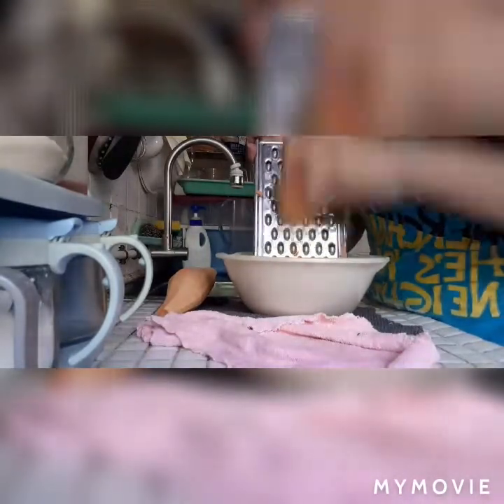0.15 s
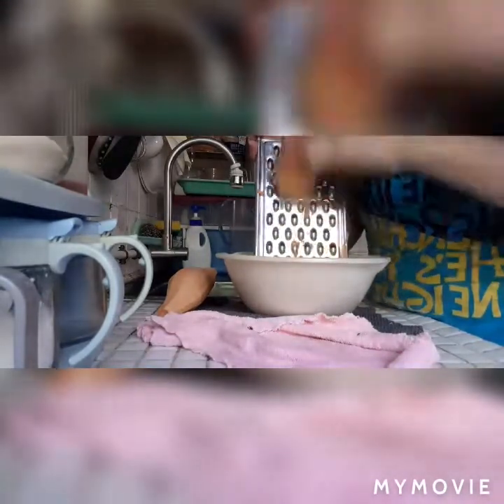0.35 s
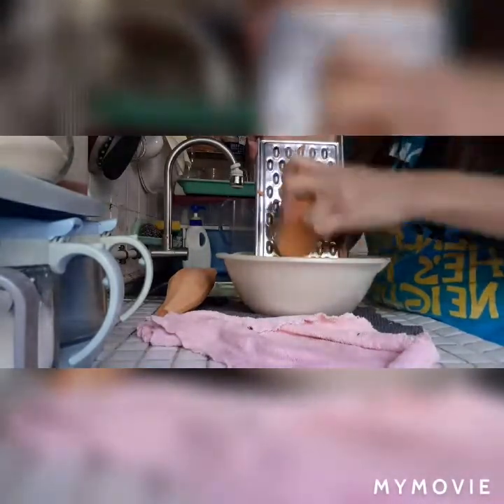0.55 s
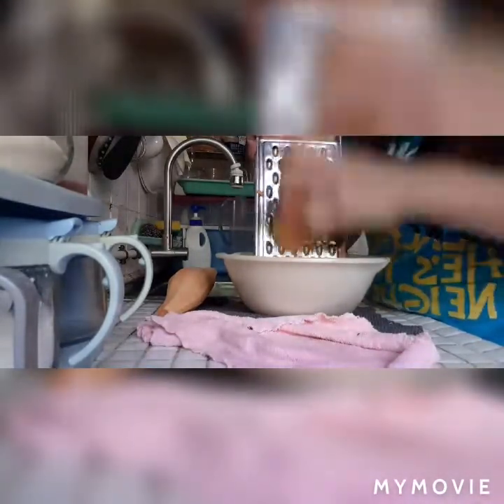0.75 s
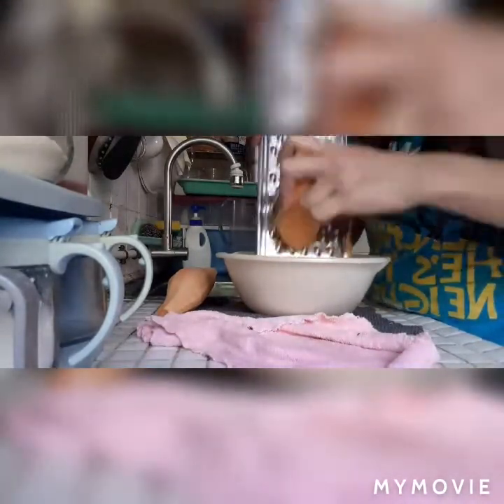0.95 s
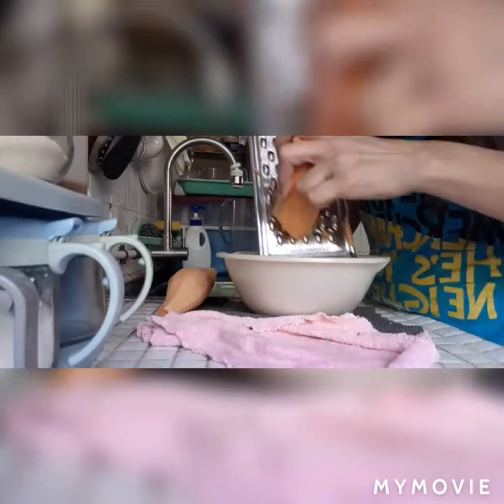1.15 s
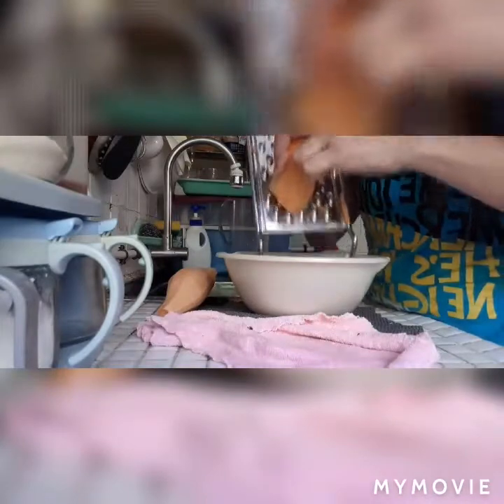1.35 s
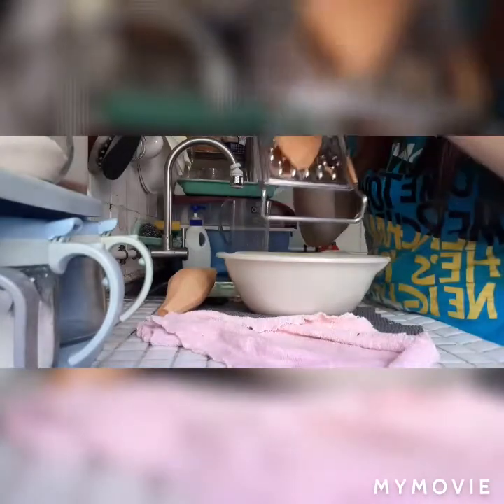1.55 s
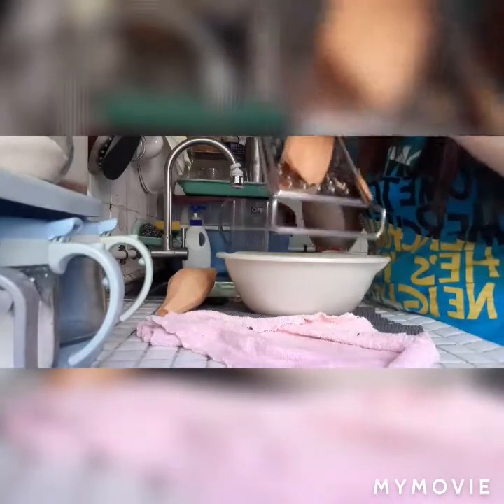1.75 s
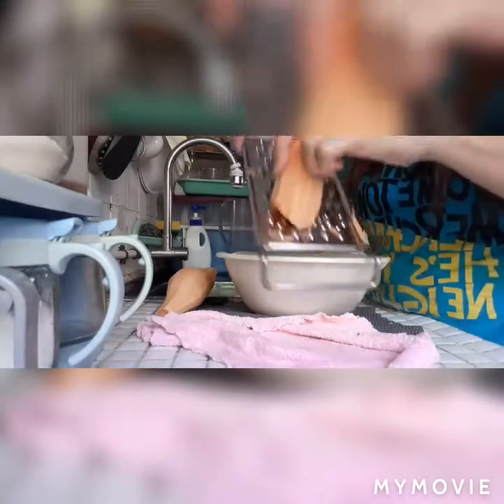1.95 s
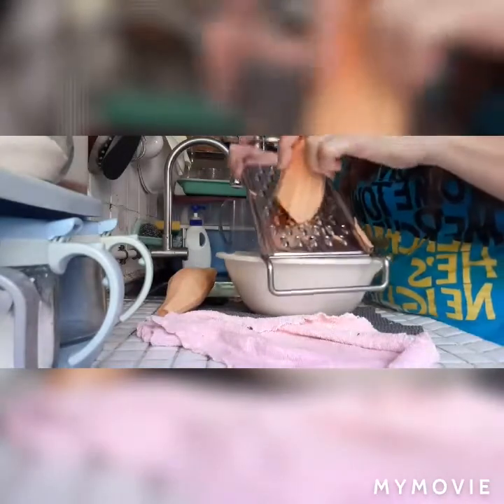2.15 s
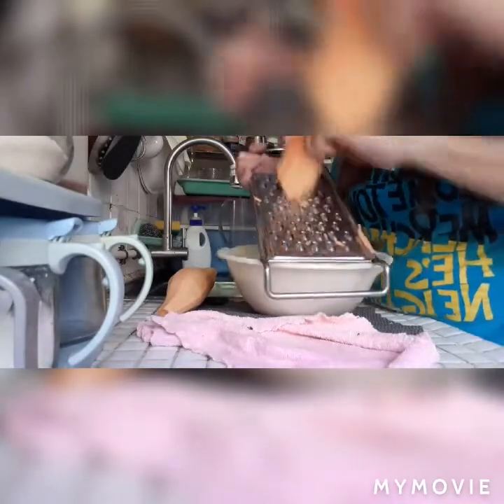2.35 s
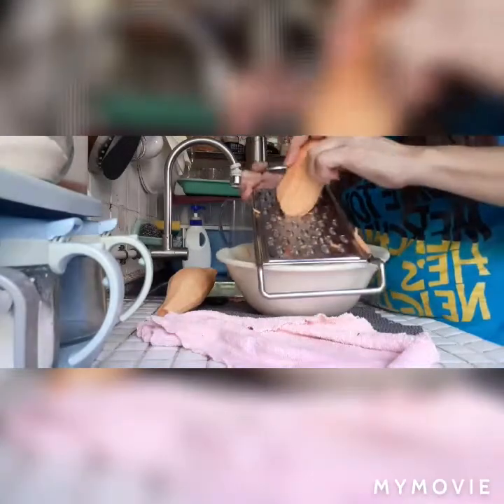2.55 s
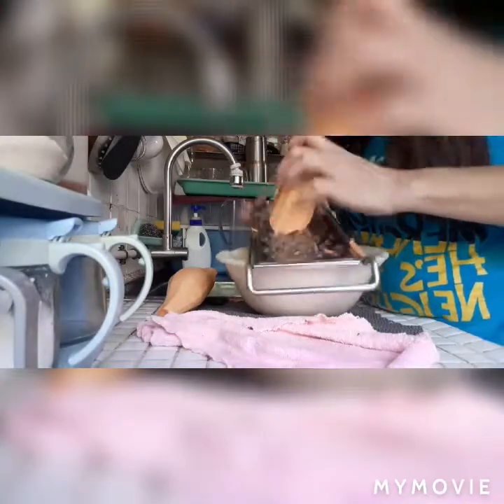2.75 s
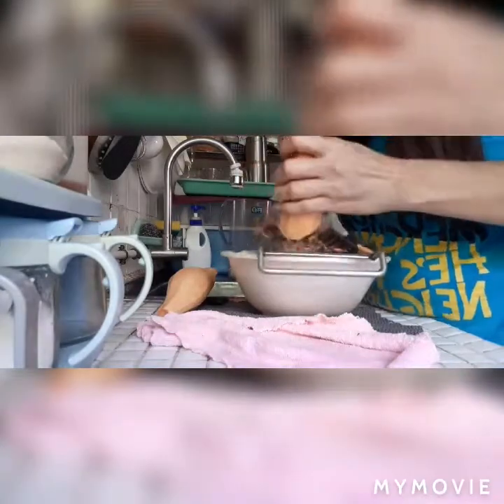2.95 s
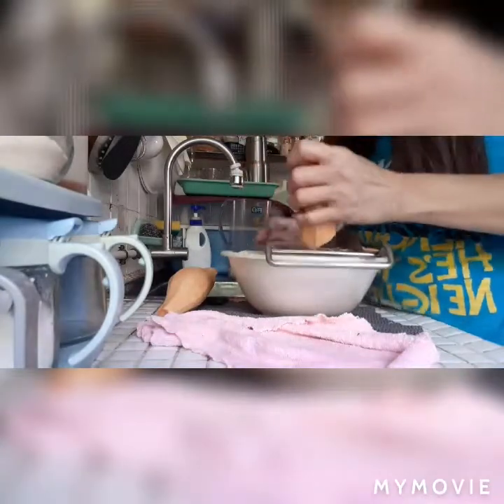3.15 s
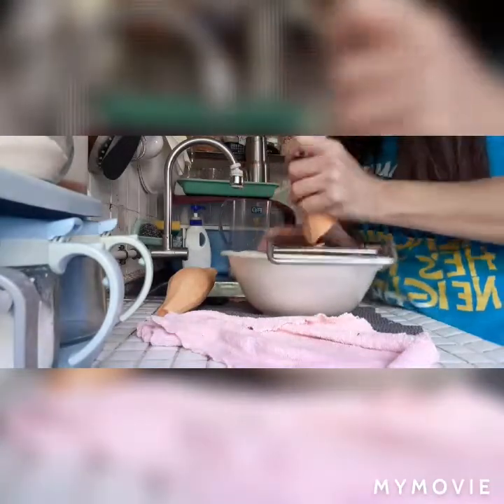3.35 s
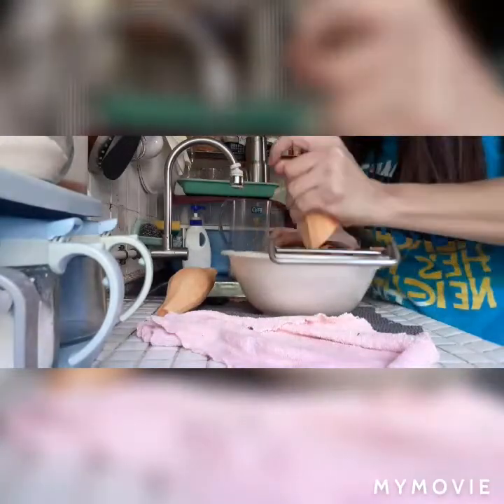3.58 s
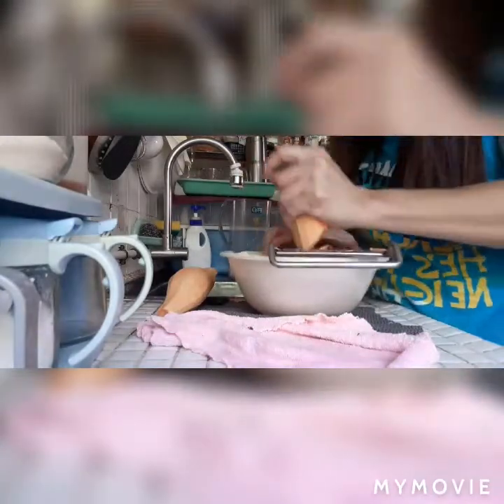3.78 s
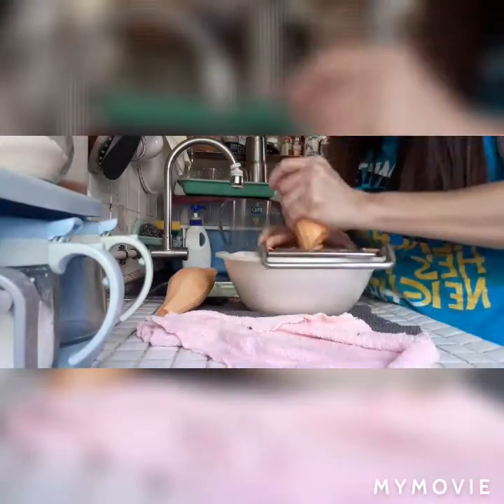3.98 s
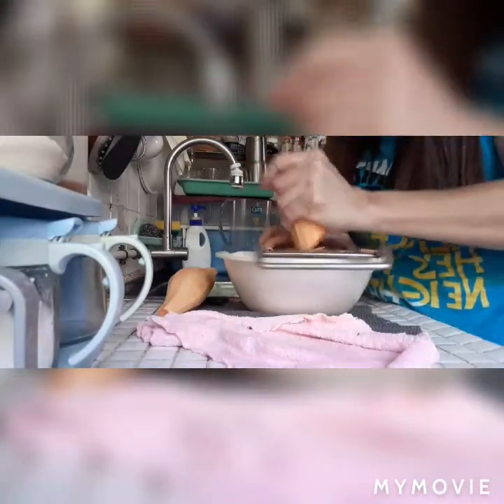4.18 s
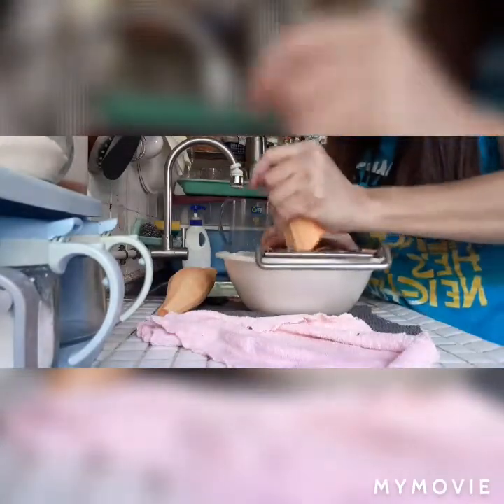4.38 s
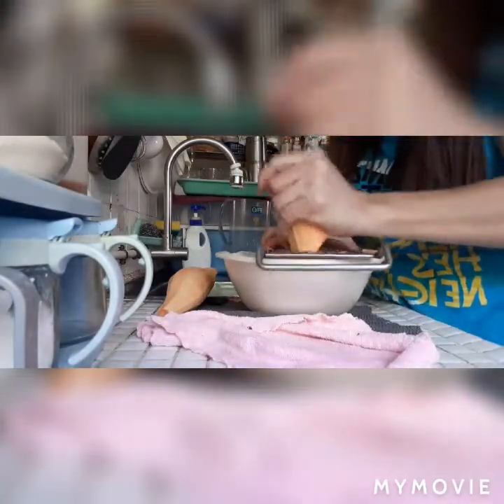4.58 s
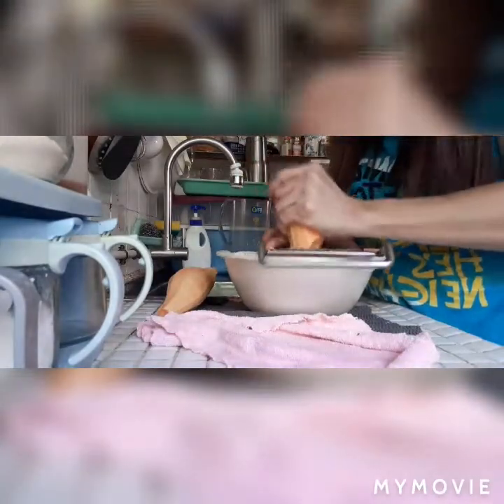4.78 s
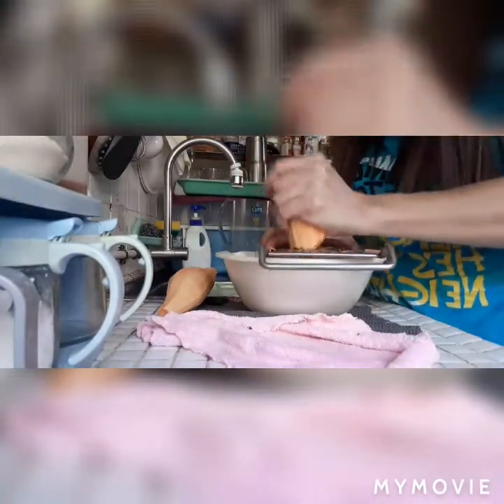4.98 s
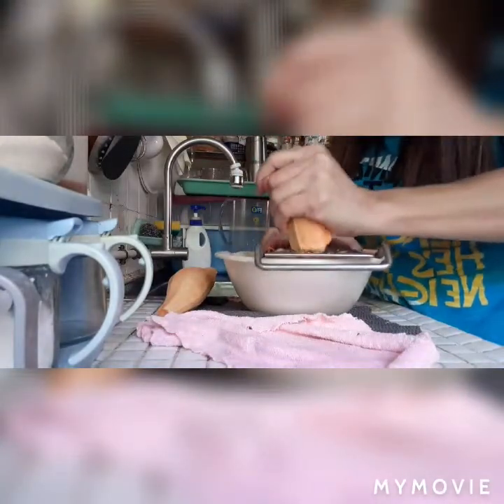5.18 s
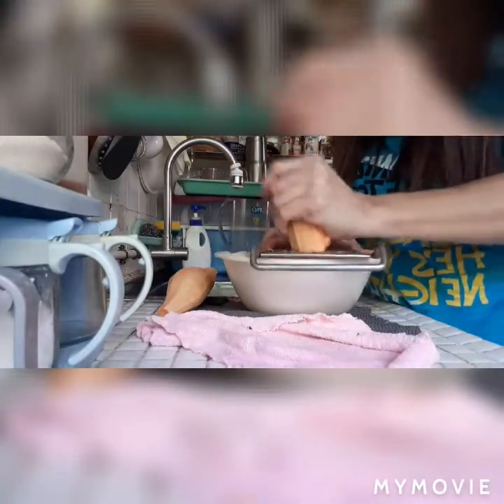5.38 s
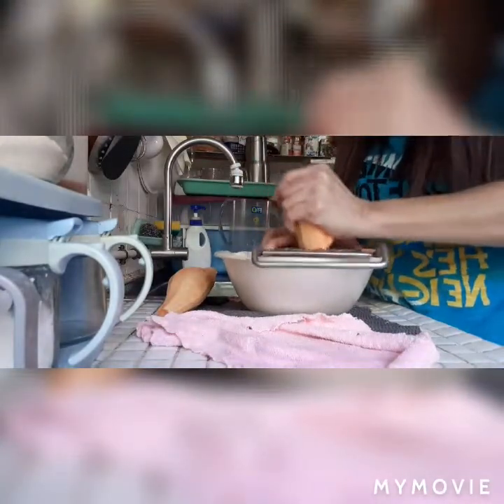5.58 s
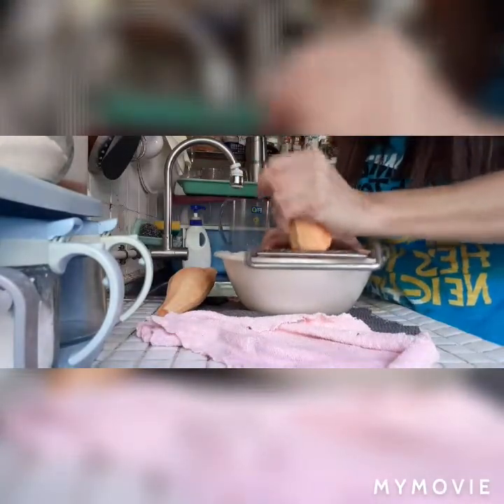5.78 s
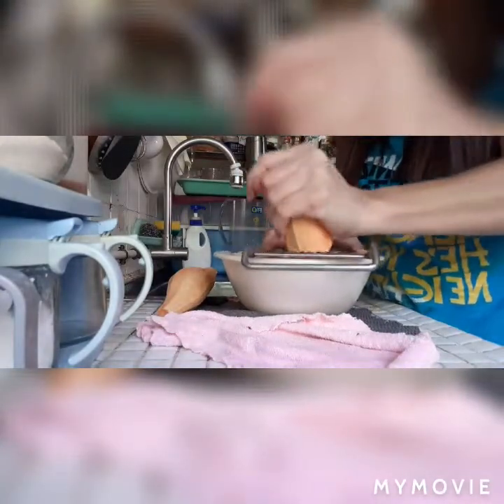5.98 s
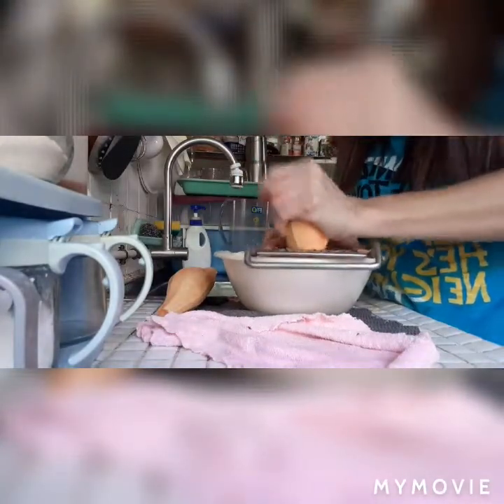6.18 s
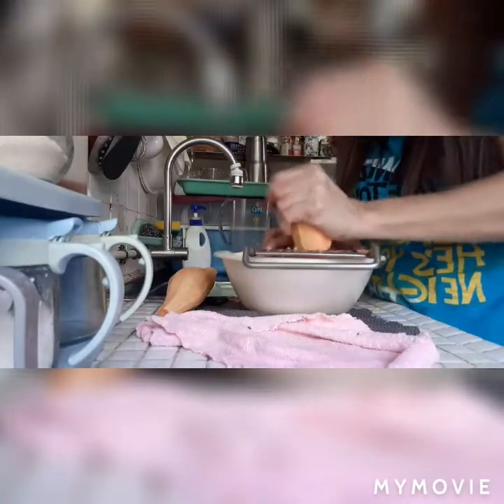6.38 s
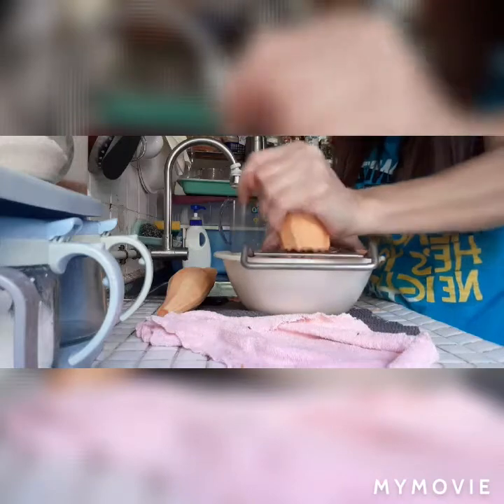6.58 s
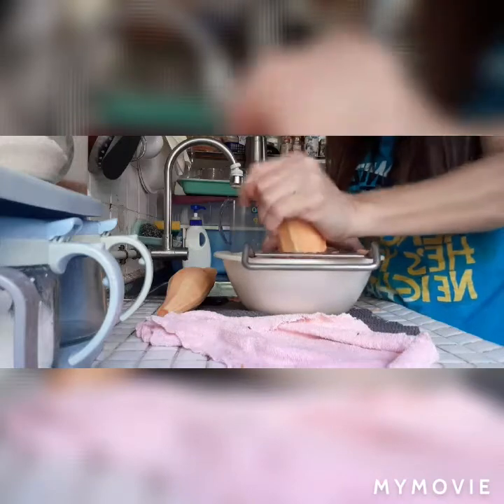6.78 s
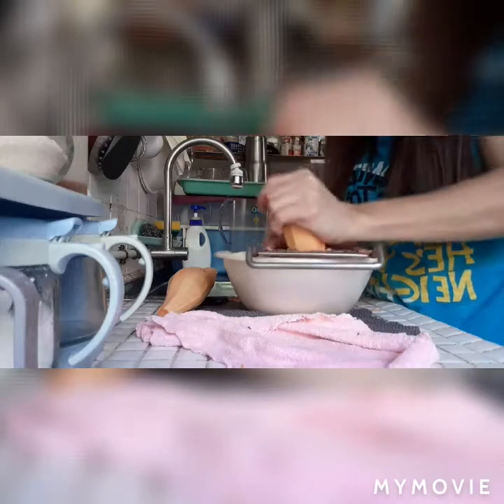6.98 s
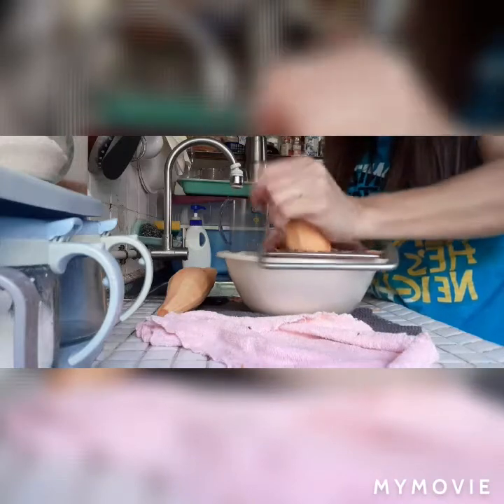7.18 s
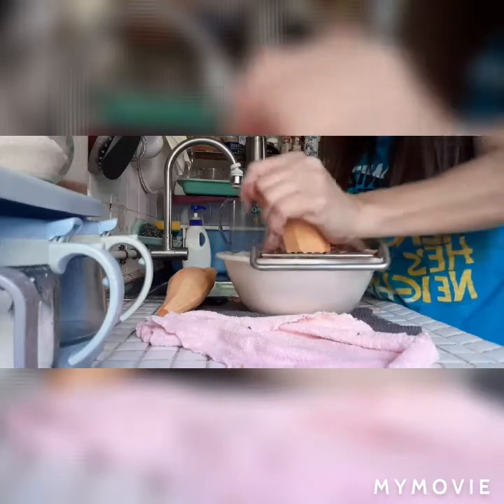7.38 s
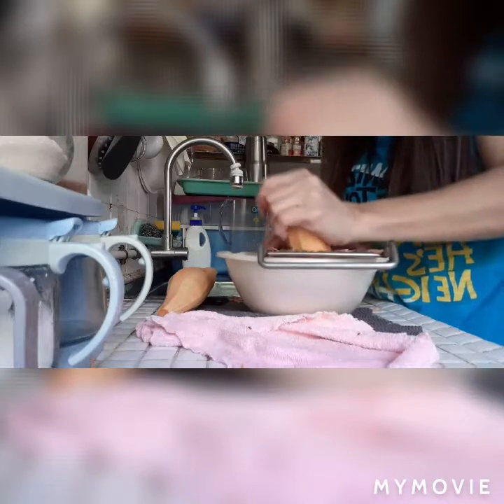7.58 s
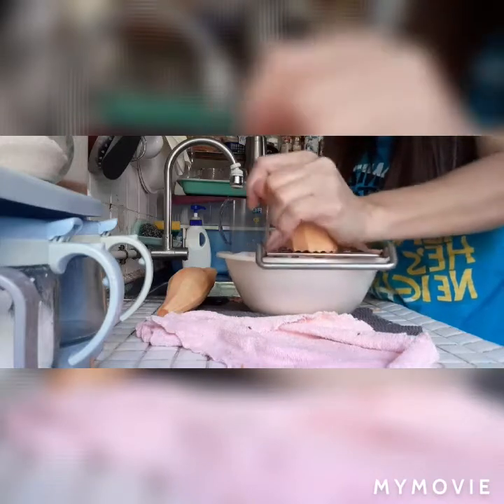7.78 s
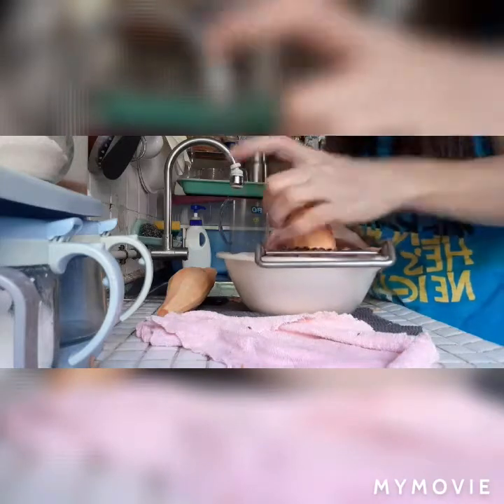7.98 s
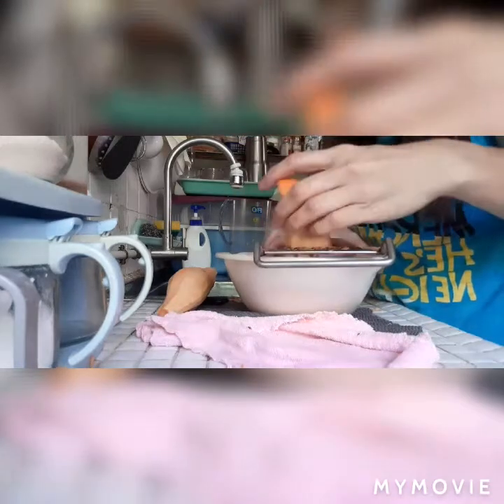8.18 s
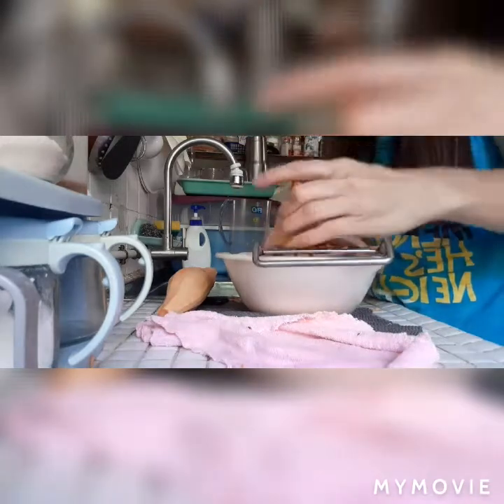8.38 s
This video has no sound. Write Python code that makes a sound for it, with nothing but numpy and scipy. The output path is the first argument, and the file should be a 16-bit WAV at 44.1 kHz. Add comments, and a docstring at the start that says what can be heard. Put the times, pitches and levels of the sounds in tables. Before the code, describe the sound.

A raw sweet potato is grated on a steel box grater in a few quick, crisp strokes. The grater is then shifted with light knocks, loose scrapes and faint wet squeaks, and lands across a bowl with a briefly ringing clank. A longer, even run of rasping strokes follows, nearly four a second. Soft thuds come through the counter, all heard close by in a quiet kitchen.

```python
"""A raw sweet potato is grated on a steel box grater over a bowl on a kitchen counter. First come a few
strokes with the grater upright: each push snaps fibres on the teeth (fizz, rasp) and shakes the box,
each return only rubs, and the counter thuds softly. Then the grater is lifted and knocks about, the wet
flesh squeaks, and at about 3 s the grater lands across the bowl, ringing its wire handle.
Last comes a long, even run of strokes."""
import sys
import numpy as np
from scipy import signal
from scipy.fft import rfft, irfft
from scipy.io import wavfile
from scipy.ndimage import uniform_filter1d

SR = 44100
rng = np.random.default_rng(int(sys.argv[2]) if len(sys.argv) > 2 else 0)


def unload_wav(signal):
    """Save mono or channel-first audio to the path in sys.argv[1] as 16-bit WAV at rate SR, clipped to [-1, 1]."""
    wavfile.write(
        sys.argv[1],
        SR,
        np.round(np.clip(np.atleast_2d(signal).T, -1, 1) * 32767).astype(np.int16),
    )


N = 371763
TIME = np.arange(N) / SR

# Levels in the tables are relative: each sound gets its final loudness when it is mixed.
# pushes of the potato down the teeth: (start [s], length [s], fizz [dB])
PUSHES = [(-0.07, 0.11, -35), (0.133, 0.15, -30), (0.424, 0.14, -30.5), (0.699, 0.14, -30),
          (3.51, 0.13, -39), (3.771, .14, -36.5), (4.031, .13, -34.5), (4.289, 0.13, -32),
          (4.547, 0.13, -31), (4.811, 0.15, -32), (5.082, .13, -30.5), (5.346, 0.15, -31),
          (5.635, 0.14, -30), (5.909, 0.14, -30), (6.182, .128, -31.5), (6.442, 0.16, -29),
          (6.736, 0.14, -28.5), (7.009, 0.13, -30.5), (7.297, 0.15, -30), (7.59, .152, -28)]
# the two ways to hold the grater: (push box ring over fizz [dB], return fizz [dB],
# return rasp over fizz [dB], return box ring over fizz [dB], longest return [s])
UPRIGHT = (-5, -49.5, -4.5, 5, .18)
ACROSS_BOWL = (-5, -40.3, -7.3, 1.6, .128)
# loose scrapes as potato and grater are moved:
# (start [s], end [s], fastest point [0-1], fizz [dB], rasp over fizz [dB], box ring over fizz [dB])
SCRAPES = [(1.47, 1.8, .2, -73, -13.5, 5), (2.367, 2.465, .42, -47, -2.5, 4),
           (2.43, 2.505, 0.38, -42.5, -3.5, 5.5), (2.575, 2.685, 0.23, -62.4, -2, 10.5),
           (2.665, 2.865, 0.25, -51, -5, 11.5), (2.955, 3.02, .5, -68, 0, 18),
           (8.19, 8.3, .3, -70.5, 0, 11)]
# tone colours of snapping fibres, tearing shreds, the shaken box, the counter, the quiet room
# and the rocking bowl: (frequency [Hz], level [dB])
FIZZ_COLOUR = [(5000, -53.5), (7500, -19), (8300, -3), (9100, -.5), (10400, -2.5), (11500, -9), (13000, -9),
               (15800, -13.5)]
RASP_COLOUR = [(300, -21), (1000, -1), (1800, 3), (2500, -1.7), (3100, -1.7), (4400, 1.5), (5100, -1.2),
               (5900, .2), (7300, -1.5), (9000, -16), (14000, -33)]
BOX_COLOUR = [(120, -35), (280, -19), (390, -14.5), (490, -15.5), (630, -17.5), (760, -2.5), (850, 1),
              (1020, -17), (1160, -12.5), (1400, -27), (1640, -14.5), (2000, -31.5), (2450, -25),
              (4000, -41.5)]
RUMBLE_COLOUR = [(20, -42.5), (45, -5.5), (70, -0.5), (120, -3), (200, -9), (300, -16.5), (600, -33.5),
                 (2000, -60.5)]
ROOM_COLOUR = [(20, -46), (45, -4.5), (75, -0.5), (150, -6), (250, -6), (420, -15.5), (850, -18),
               (1700, -23.5), (2600, -30), (3500, -40.5), (7500, -55.5), (8800, -42), (11000, -53),
               (15800, -58)]
BOWL_COLOUR = [(120, -27), (280, -3), (430, -1), (680, -2.5), (1100, -13.5), (3000, -40)]
# echo from the kitchen tiles: (frequency [Hz], time to fade by 60 dB [s])
TILE_ECHO = [(100, 0.58), (800, 0.18), (3000, 0.32), (9000, 0.19), (16000, 0.27)]
# the notes the steel box rings with: (pitch [Hz], level [dB], base time to fade by 60 dB [s])
BOX_NOTES = [(308.5, -3, 0.039), (400, 0.5, 0.052), (582, -11, .05), (781, -3, 0.019), (853, -1, 0.024),
             (927, -25, 0.032), (1190, -12.5, 0.02), (1545, -5, 0.032), (1690, -3, 0.023),
             (1960, -7.5, .022), (2153, -7, .025), (2432, -3.5, 0.016), (2787, -6.5, 0.02),
             (3140, -13.5, .02), (3570, -17, .02), (4030, -15, 0.022), (4700, -23, .022)]
# knocks, light ticks and tooth catches of the grater: (time [s], clank [dB],
# hollow bottom over clank [dB], bright edge over clank [dB], sizzle over clank [dB], ring time [factor])
KNOCKS = [(0.037, -57, 4, 9, 1, 1.2), (0.147, -43.5, -6, -6.5, -2, 1.2), (0.315, -49.5, -21, 2.5, -6, 1.8),
          (0.872, -61, 5, 14, -11, 1.2), (2.015, -36, -4, -9, -27, 1.3),
          (2.034, -34.5, -3, -11.5, -25, .92), (2.234, -51.5, -13, -16, -28, 1),
          (2.399, -35, -28, -14, -6, 1.4), (2.47, -29.5, -6, -12, -16, 1.17),
          (2.8, -31, -3.5, -8, -17, 1.1), (2.922, -50, -5.5, -9.5, -26, 2.2), (2.985, -52, -5, -3, -20, 2),
          (3.078, -20.2, -9, -9, -23, 2.6), (3.113, -33, -0.5, -13, -19, 1.3),
          (3.174, -42, 0, -4.5, -20, 0.55), (3.405, -37.5, -3, -14.5, -32, 2),
          (3.439, -33, -4.5, -8, -16, 1.45), (3.497, -46.5, -1, -9, -24, 1.1),
          (3.674, -45.5, .5, -5, -14, 1), (3.709, -36.5, -6.5, -15, -16, 1.3),
          (3.75, -29, -8.5, -6.5, -26, 0.87), (3.939, -30, -12, -9.5, -17, 1),
          (3.957, -37, 0, -3.5, -20, 1.3), (4.006, -30.5, -4, -7, -25, 1.1),
          (4.425, -39.5, -22, 3, -23, 1.1), (5.04, -30, -19, -11, -20, 1.5),
          (5.556, -30, -2.5, -5, -16, .69), (5.823, -34, -4, -5, -13, 1.2), (6.309, -39, -13, -5, 2.5, 1.7),
          (6.764, -44, -21, -7, 6, 1), (7.458, -57, 0, 12.5, -6, 1)]
# a tooth catching, like a tiny knock: the columns of KNOCKS without the time
TOOTH_CATCH = (-51, -9, -4.5, -7, 1.1)
# the arms lean on the counter and it rumbles: (start [s], length [s], level [dB])
ARM_LEANS = [(0.618, 0.25, -38.5), (.95, 0.38, -40), (2.02, 0.15, -36), (3.82, 0.093, -33),
             (4.19, .22, -40.5), (4.893, 0.21, -31), (6.529, 0.29, -35.5), (8.03, 0.34, -36.5)]
# soft bumps through the counter: (time [s], level [dB], pitch [Hz])
THUDS = [(0.803, -27, 83.4), (0.992, -27, 143), (1.059, -28.5, 78.1), (1.264, -30.5, 67.3),
         (4.94, -31, 178), (5.013, -29, 113), (5.944, -25, 75.4), (6.581, -29, 118), (6.639, -27, 113),
         (6.679, -28, 106), (7.479, -28, 72.7), (7.988, -26.5, 91.5), (8.126, -23, 94.2)]
# wet flesh squeaking on steel: (start [s], length [s], pitch [Hz], level [dB])
SQUEAKS = [(2.502, 0.19, 5060, -63), (2.563, 0.15, 6487, -72), (2.696, .03, 850, -26),
           (2.725, .05, 900, -35), (5.574, .034, 790, -25.5), (5.962, .022, 850, -22),
           (6.7, .022, 848, -28), (7.203, 0.055, 4080, -55), (7.55, .022, 840, -21)]
# the notes of the wire handle: (pitch [Hz], level [dB], time to fade by 60 dB [s])
HANDLE_NOTES = [(256, -25, 0.12), (1550, -31.5, 0.14), (1700, -20, 0.085), (1955, -34, .11),
                (3640, -33, 0.06)]

LANDING_S = 3.079  # the grater is laid across the bowl


def gain_of(db):
    """Turns decibels into a number to multiply a sound by."""
    return 10 ** (np.asarray(db) / 20)


def evened(x):
    """Scales a signal to an average strength (rms) of 1."""
    return x / np.sqrt(np.mean(x ** 2) + 1e-20)


def look_up(points, hz):
    """Reads between the rows of a (frequency, value) table, on a scale of octaves."""
    known_hz, value = np.transpose(points)
    return np.interp(np.log(hz + 1), np.log(known_hz + 1), value)


def add(mix, start_s, sound):
    """Mixes a sound in at the given time."""
    part = mix[max(round(start_s * SR), 0):][:len(sound)]
    part += sound[:len(part)]


def coloured(x, colour, ripple_db=0, size=4096):
    """Gives a sound a tone colour; the ripple stands for the many narrow notes of thin sheet steel."""
    hz = np.fft.rfftfreq(size, 1 / SR)
    ripple = evened(uniform_filter1d(uniform_filter1d(rng.standard_normal(len(hz)), size=6), size=4))
    level_db = look_up(colour, hz) + ripple_db * ripple * np.minimum(hz / 2000, 1)
    # fold the filter in time so that it rings only after a click, never before
    cepstrum = irfft(np.log(gain_of(level_db)))
    cepstrum[1:size // 2] *= 2
    cepstrum[size // 2 + 1:] = 0
    ring = irfft(np.exp(rfft(cepstrum)))
    return signal.oaconvolve(x, ring / np.linalg.norm(ring))[:len(x)]


def wander(hz):
    """A smooth random wobble, with up to about hz swings a second."""
    frequency = np.fft.rfftfreq(N, 1 / SR)
    return evened(irfft(rfft(rng.standard_normal(N)) / (1 + (frequency / hz) ** 4), N))


def hand_strokes():
    """Lists the pushes, and the light returns between them, as rows like those of SCRAPES."""
    push_fastest, return_fastest = .52, .71  # share of the way through the stroke
    overlap_s, let_go_s = .006, .35  # strokes overlap at the turn; a long gap has no return
    push_rasp_db, full_push_db, bear_down_db_per_s = -9, -29, .65
    pushes, returns, last_end = [], [], -np.inf
    for start, length, db in PUSHES:
        hold = UPRIGHT if start < LANDING_S else ACROSS_BOWL
        box_db, back_db, back_rasp_db, back_box_db, back_s = hold
        if start - last_end < let_go_s:
            back_db += .55 * (db - full_push_db)  # a louder return leads into a louder push
            back_start = max(last_end - overlap_s, start - back_s)
            returns.append((back_start, start + overlap_s, return_fastest, back_db, back_rasp_db, back_box_db))
        last_end = start + length
        box_db += bear_down_db_per_s * max(start - LANDING_S, 0)  # the box shakes more and more
        pushes.append((start, last_end, push_fastest, db, push_rasp_db, box_db))
    return pushes, returns


def stroke_loudness(strokes, swell):
    """Loudness curves for fizz, rasp and box ring: the hand speeds up and slows down in each stroke."""
    power = np.zeros((3, N))
    for start, end, fastest, db, rasp_db, box_db in strokes:
        during = (TIME > start) & (TIME < end)
        fastest_s = start + fastest * (end - start)
        speed = np.sin(np.interp(TIME[during], [start, fastest_s, end], [0, np.pi / 2, np.pi]))
        power[:, during] += (gain_of([[db], [db + rasp_db], [db + box_db]]) * speed ** swell) ** 2
    return np.sqrt(power)


def snaps(per_s, spread_db):
    """Random clicks, a few much larger than the rest."""
    size = gain_of(spread_db * np.minimum(rng.exponential(1, N), 4))
    return evened(size * rng.choice([-1, 1], N) * (rng.random(N) < per_s / SR))


def steel_plate(x, colour, place, ripple_db, detune):
    """The potato damps the plate where it presses, so the colour glides between five contact points."""
    out, step = np.zeros(N), .5
    for point in np.arange(-1, 1 + step, step):
        nearness = np.cos(np.pi / 2 * np.minimum(abs(place - point) / step, 1))
        shifted = [(hz * (1 + detune * point), db) for hz, db in colour]
        out += coloured(x * nearness, shifted, ripple_db)
    # neighbouring points partly boost each other, so turn down the places between them
    return out / np.sqrt(1 + .5 * abs(np.sin(np.pi * place / step)))


def grating(pushes, rubs):
    """Fibres snap on the teeth (fizz), shreds tear (rasp) and slips of the whole potato shake the box."""
    bite = wander(hz=79)  # rows of teeth bite and let go
    cut_fizz, cut_rasp, cut_box = stroke_loudness(pushes, swell=1.34) * evened(gain_of(1.45 * bite))
    rub_fizz, rub_rasp, rub_box = stroke_loudness(rubs, swell=1.22) * evened(gain_of(2.2 * bite))
    upright_shift = .4 * (TIME < LANDING_S)  # upright, it is rubbed nearer one end and rings higher
    place = np.sin(1.22 * wander(hz=8) + upright_shift)  # contact point on the plate, -1 to 1
    fibres = snaps(per_s=9500, spread_db=2.5)
    tears = snaps(per_s=3500, spread_db=2.5)
    dull_fibres = signal.sosfilt(signal.butter(1, 11600, fs=SR, output="sos"), fibres)
    crackle = cut_fizz * fibres + gain_of(2.5) * rub_fizz * dull_fibres  # rubbing is duller than cutting
    fizz = steel_plate(crackle, FIZZ_COLOUR, place, ripple_db=2, detune=.02)
    rasp = steel_plate((cut_rasp + rub_rasp) * tears, RASP_COLOUR, place, ripple_db=3.3, detune=.052)
    slips = snaps(per_s=1400, spread_db=2)
    box = steel_plate((cut_box + rub_box) * slips, BOX_COLOUR, place, ripple_db=3.4, detune=.06)
    return gain_of(-.45) * fizz + gain_of(.73) * rasp + gain_of(1) * box


def lingering(x, hold_s=.045):
    """The power of a sound, taken up and held for a moment by the counter."""
    keep = np.exp(-1 / (hold_s * SR))
    return abs(uniform_filter1d(signal.lfilter([1 - keep], [1, -keep], x ** 2), size=512))


def counter_rumble(scraping, blows):
    """The counter's low rumble rises with each stroke, knock and lean of the arms."""
    softened = np.tanh(abs(blows) / .02) * .02  # hard knocks shake it little more than soft ones
    resting_power = gain_of(-51) ** 2
    power = resting_power + lingering(gain_of(-10) * scraping) + lingering(gain_of(-3.5) * softened)
    for start, length, db in ARM_LEANS:
        add(power, start, gain_of(db) ** 2 * np.hanning(round(length * SR)))
    return gain_of(-2.5) * np.sqrt(power) * coloured(rng.standard_normal(N), RUMBLE_COLOUR)


def kitchen_echo(x):
    """Scattered echoes bounce off the tiles, each band of pitch fading at its own speed."""
    length = SR // 2
    echoes = rng.choice([-1., 1.], length) * (rng.random(length) < 3200 / SR) * (TIME[:length] > .0045)
    hz, t, bands = signal.stft(echoes, SR, nperseg=256)
    fade = gain_of(-60 * t / look_up(TILE_ECHO, hz)[:, None])
    tail = signal.istft(bands * fade, SR, nperseg=256)[1]
    return signal.fftconvolve(x, tail / np.linalg.norm(tail))[:N]


def knocks(blows):
    """Each knock or tick rings the box; the teeth sizzle, loose contact chatters and the bowl rocks."""
    hz, note_db, fade_s = np.transpose(BOX_NOTES)[:, :, None]
    t = np.arange(SR // 3) / SR
    onset = 1 - np.exp(-t / .0009)  # the blow takes a moment to spread over the box
    clanks, sizzle, chatter, rocking = np.zeros((4, N))
    for start, db, bottom_db, edge_db, sizzle_db, ring in blows:
        grip = 1 + .017 * rng.standard_normal(hz.shape)  # the hand detunes the notes a little
        fade = onset * gain_of(-60 * t / (fade_s * ring))
        early_strength = np.sqrt(np.mean(fade[:, t < .015] ** 2, 1, keepdims=True) / 2)
        notes = fade * np.sin(2 * np.pi * hz * grip * t) / early_strength
        tone_db = np.interp(hz, [450, 700, 1050, 1500], [bottom_db, 0, 0, edge_db])
        direction = np.where(hz > 1000, rng.choice([-1, 1], hz.shape), 1)  # high notes start either way
        add(clanks, start, (direction * gain_of(db + note_db + tone_db) * notes).sum(0))
        grit = onset * rng.standard_normal(len(t))
        add(sizzle, start, gain_of(db + sizzle_db) * np.exp(-t / .012) * grit)
        add(chatter, start, gain_of(db + edge_db) * np.exp(-t / (.0071 * ring)) * grit)
        add(rocking, start, gain_of(db + bottom_db) * np.exp(-t / (.011 * ring)) * grit)
    bowl = coloured(rocking, BOWL_COLOUR)
    teeth = gain_of(7) * coloured(sizzle, FIZZ_COLOUR)
    loose_contact = gain_of(-6) * coloured(chatter, RASP_COLOUR)
    return gain_of(-1.05) * clanks + teeth + loose_contact + bowl


def tooth_catches(returns, count=3, spread_db=3.5):
    """In each return a few teeth catch at random; lists them as rows like those of KNOCKS."""
    db, *tone = TOOTH_CATCH
    catches = []
    for start, end, *_ in returns:
        for place, strength in rng.random((count, 2)):
            catches.append((start + place * (end - start), db + spread_db * (2 * strength - 1), *tone))
    return catches


def counter_thuds():
    """Dull bumps, only a few swings long, come through the counter."""
    out, t = np.zeros(N), np.arange(SR // 4) / SR
    rise = t / .0055
    counter_note = gain_of(-7) * np.sin(2 * np.pi * 185 * t)
    for start, db, hz in THUDS:
        boom = np.sin(2 * np.pi * hz * t) + counter_note
        add(out, start, gain_of(db - 3) * rise * np.exp(1 - rise) * boom)
    return out


def squeaks():
    """The wet flesh sticks and slips on the steel, as a high squeal or a short judder of the box."""
    out, waver = np.zeros(N), wander(hz=140)
    for start, length, hz, db in SQUEAKS:
        pitch = hz * (1 + .0076 * waver[(TIME > start) & (TIME < start + length)])
        tone = np.sin(2 * np.pi * np.cumsum(pitch) / SR)
        add(out, start, gain_of(db) * np.hanning(len(pitch)) * tone)
    return out


def handle_ring():
    """The stiff wire handle rings once as the grater drops across the rim of the bowl."""
    hz, db, fade_s = np.transpose(HANDLE_NOTES)[:, :, None]
    out, t = np.zeros(N), np.arange(SR // 3) / SR
    notes = gain_of(db - 60 * t / fade_s) * np.sin(2 * np.pi * hz * t)
    add(out, LANDING_S, notes.sum(0) * (1 - np.exp(-t / .0018)))
    return out


def scene():
    """Mixes grater, counter and the quiet room, the same in both channels."""
    pushes, returns = hand_strokes()
    scraping = grating(pushes, returns + SCRAPES) + squeaks()
    blows = knocks(KNOCKS + tooth_catches(returns)) + handle_ring()
    echo = kitchen_echo(gain_of(-10) * scraping + gain_of(-9.5) * blows)
    quiet_room = gain_of(-50) * coloured(rng.standard_normal(N), ROOM_COLOUR)
    counter = counter_rumble(scraping, blows) + counter_thuds()
    return np.tile(scraping + blows + echo + counter + quiet_room, (2, 1))


def record(dry):
    """Trims away the deepest rumble and the very highest treble."""
    lowest_hz, highest_hz = 42, 15850
    dry = signal.sosfilt(signal.butter(3, lowest_hz, "highpass", fs=SR, output="sos"), dry)
    treble_cut = signal.firwin(511, highest_hz, window=("kaiser", 9), fs=SR)
    return signal.oaconvolve(dry, treble_cut[None], "same")


dry = scene()
out = record(dry)
unload_wav(out)
```